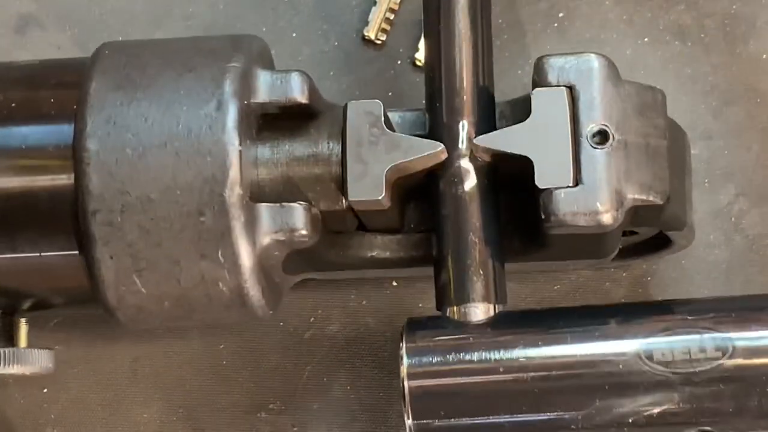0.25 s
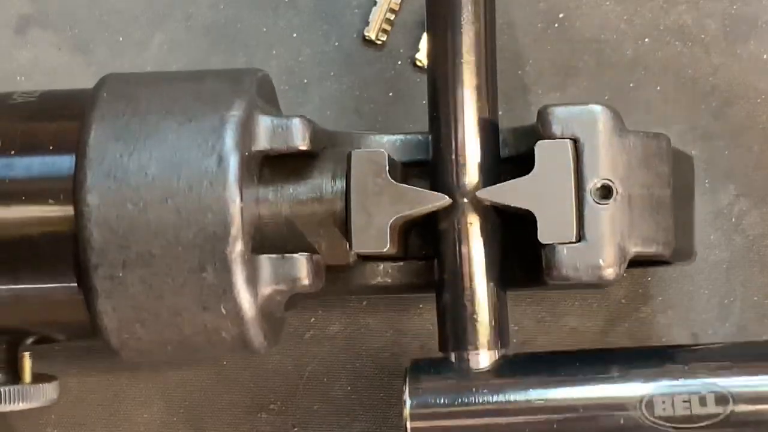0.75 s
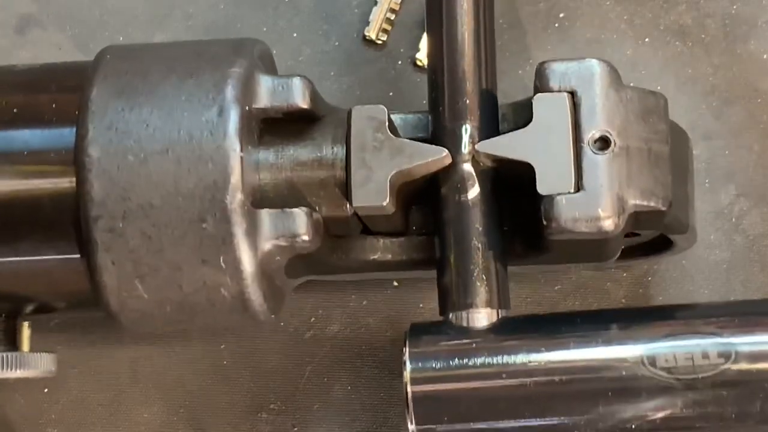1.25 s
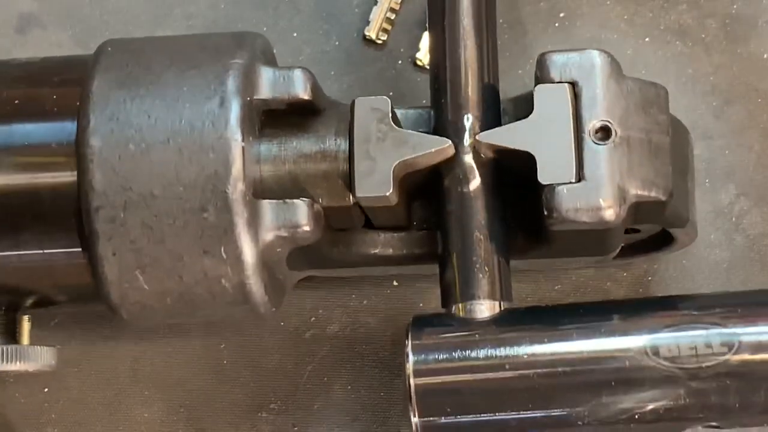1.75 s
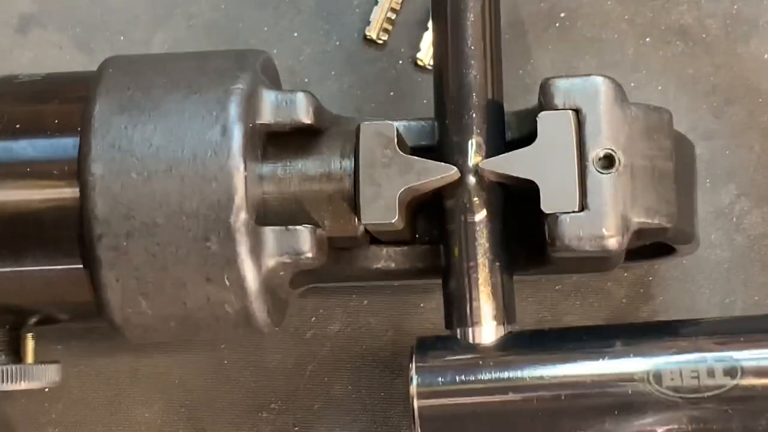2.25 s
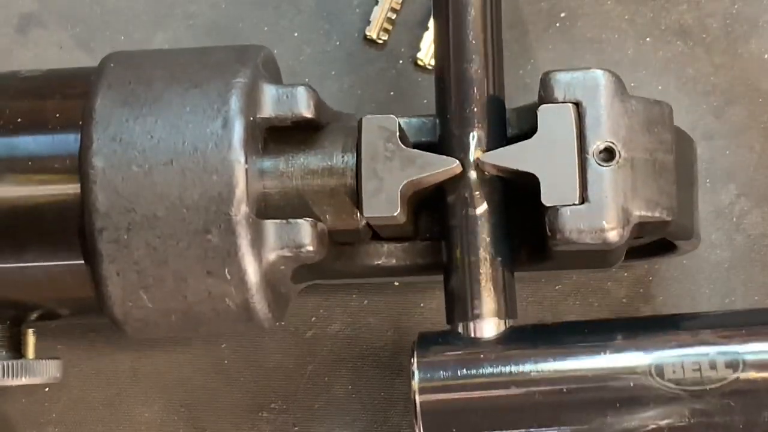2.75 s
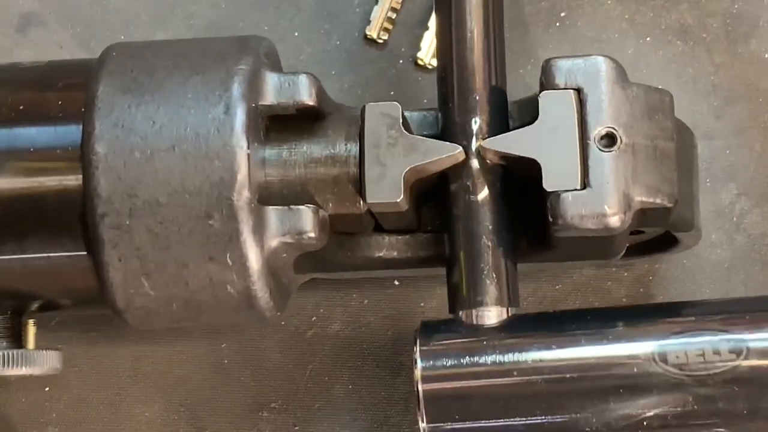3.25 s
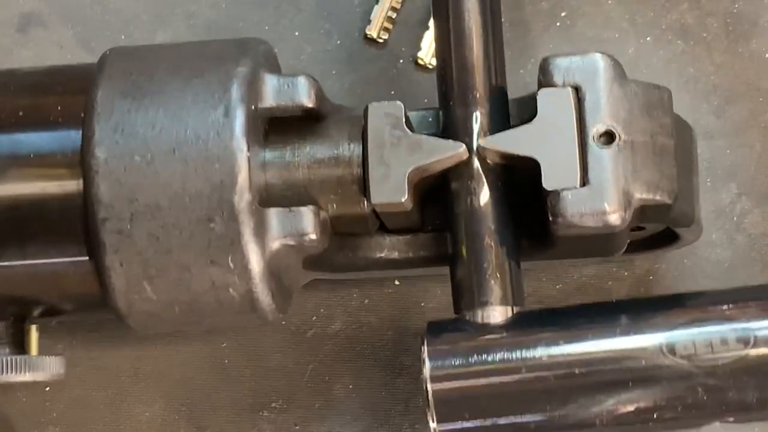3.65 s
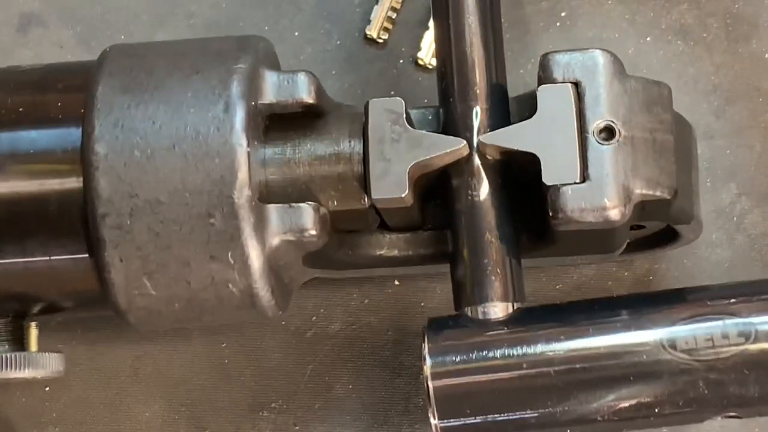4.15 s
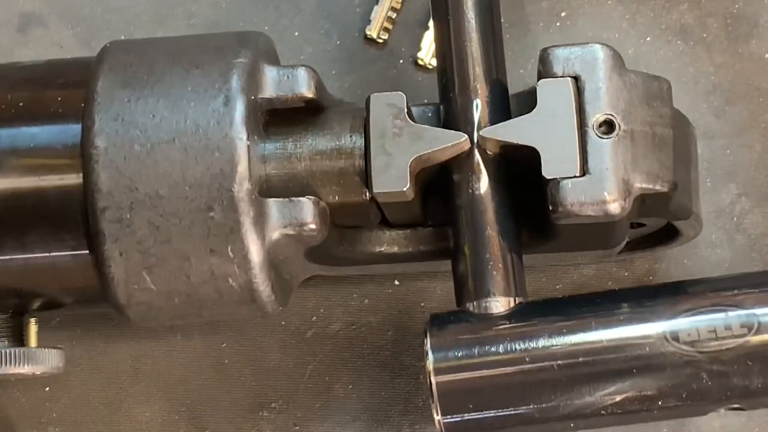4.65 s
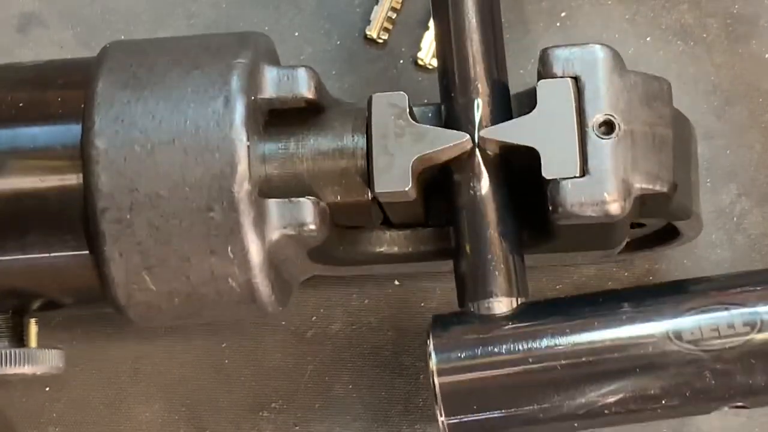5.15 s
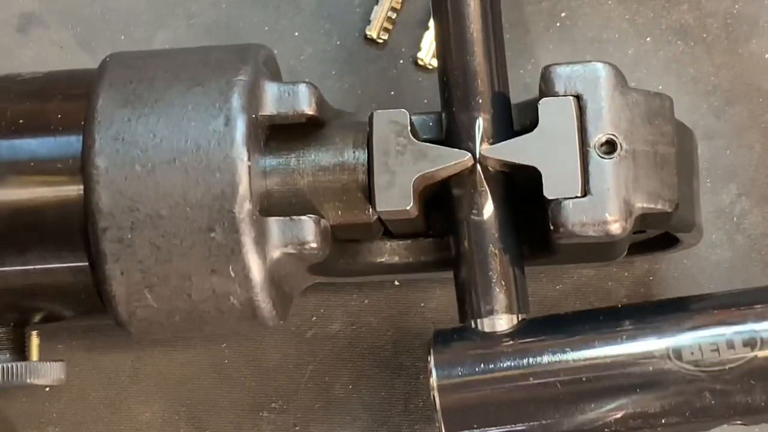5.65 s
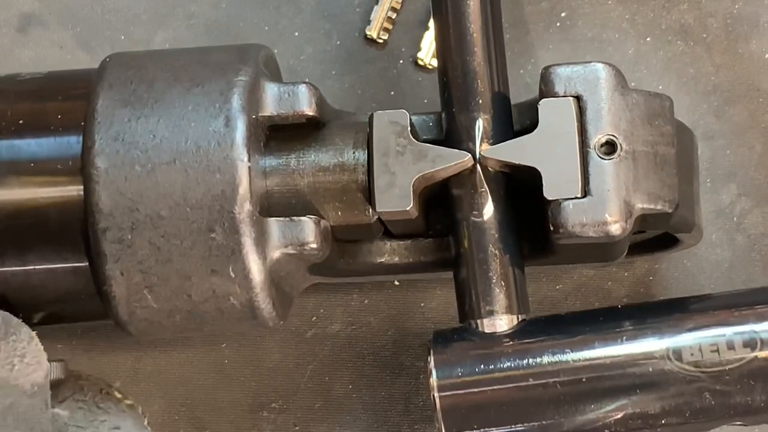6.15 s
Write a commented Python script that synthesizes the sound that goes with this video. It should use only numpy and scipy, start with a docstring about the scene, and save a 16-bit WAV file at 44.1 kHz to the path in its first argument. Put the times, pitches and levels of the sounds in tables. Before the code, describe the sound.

A hand-pumped hydraulic cutter clacks and thumps steadily on a garage workbench until a steel lock shackle snaps with one huge ringing crack, then two more strokes.

```python
"""A garage workbench: a hand-pumped hydraulic cutter works on a steel lock, close to the microphone.
Handle linkage: noise chatter ringing pins and link. Lock: jingles from short noise contacts on steel modes.
Bench: blows ring the top, rock the legs and knock loose things. Shackle: one crack, its peaks saturated.
Behind: sway, glove rustle and plunger hiss as shaped noise; the room's answer, steady air and a mains hum."""
import sys
import numpy as np
from scipy import signal
from scipy.fft import rfft, irfft
from scipy.io import wavfile
from scipy.ndimage import uniform_filter1d

SR = 44100
rng = np.random.default_rng(int(sys.argv[2]) if len(sys.argv) > 2 else 0)


def ratio_of_db(decibels):
    """Turn decibels (scalar or array-like) into linear amplitude factors; 0 dB maps to 1."""
    return 10 ** (np.asarray(decibels, float) / 20)


def transcribe(u):
    """Save the signal u as a 16-bit wav file named by the first command-line argument.

    u: samples, shape (n,) or (channels, n), limited to [-1, 1]; the rate is SR.
    q: integer samples, one column per channel.
    """
    v = np.clip(np.atleast_2d(u).T, -1, 1)
    q = np.round(v * 32767).astype(np.int16)
    wavfile.write(sys.argv[1], SR, q)


N = 282681
SHORT, LONG = SR // 4, SR // 2  # samples

# pull starts, linkage snaps tight: t/s, click level/dB, slack tick lead/s, bench blow level/dB, load/0-1
PULLS = [(.3017, -33.5, .014, -19., .85), (1.0465, -29.8, .0101, -17., 1.),
         (1.8272, -34.5, .0098, -18., 1.), (2.5381, -29.5, .0077, -18., 1.),
         (3.246, -34.7, .0134, -18., .85), (4.0637, -33.9, .0215, -21., 0.),
         (4.7606, -30.5, .0215, -19., 0.)]
# handle hits its stop: t/s, click level/dB, bench blow level/dB, rebound level/dB, knock level/dB re rebound
STOPS = [(.6105, -38.8, -14.5, -25., -14.), (1.3967, -46.7, -20., -38., -3.),
         (2.0936, -40.4, -16., -28., -10.), (2.8024, -35.5, -13., -31., -3.),
         (4.2278, -34.6, -11., -23., -6.), (4.9308, -32.8, -11.5, -22., -7.)]
# loose linkage ticks: t/s, level/dB, brightness/dB per octave, lower pin share/0-1
TICKS = [(.0613, -49.3, -5., .13), (.2329, -48.4, -2.3, .11), (.4738, -55.8, -7.9, .24),
         (.753, -56., -9., .8), (.979, -57., -10., .6), (.8145, -44.7, -7.7, .2),
         (1.3274, -55.5, -7.6, .66), (1.3578, -51.8, -7.6, .93), (1.6013, -45.5, -9.4, .78),
         (1.7784, -46.2, -1.6, .03), (1.926, -50., -8.9, .58), (2.1096, -29.2, -4.9, .36),
         (2.3176, -50.3, -3.8, .06), (2.485, -53., -9., .6), (3.0165, -46.9, -1.8, .06),
         (3.6444, -44.4, 1.3, .12), (3.8028, -54.8, -6.5, .1), (4.567, -53.7, -7.3, .15)]
# upper and lower handle pin: f/Hz, level/dB, t60/s
PIN_MODES = [(3070, 0., .015), (2590, 0., .012)]
# handle link: f/Hz, level/dB before brightness and scatter, t60/s
LINK_MODES = [(780, -10., .02), (2120, -14., .01), (5000, -12., .008), (8000, -5., .008), (9550, -8., .01)]
# lock body knocks against the jaws: t/s, treble level/dB, bar ring near 7 kHz level/dB re treble,
# low knock level/dB re treble
JINGLES = [(0.3496, -51.8, -15.2, -13.7), (0.394, -53.2, -18.5, 0.0), (0.6374, -47.5, -15.3, -15.1),
           (1.0929, -49.0, -15.3, -10.3), (1.8771, -52.3, -12.6, -1.4), (2.0974, -50.9, 0.7, 14.7),
           (2.1096, -37.7, -11.6, 7.0), (2.5574, -45.4, -6.7, 10.4), (2.578, -31.4, -17.4, -12.9),
           (2.5955, -29.5, -4.9, 0.1), (2.6174, -36.8, -23.8, -9.1), (2.809, -25.6, -2.6, 3.2),
           (2.8214, -36.9, 0.4, 2.6), (3.269, -40.0, -0.8, 5.9), (3.2859, -26.9, -26.1, -13.2),
           (3.3089, -27.7, -4.3, 0.3), (3.3294, -47.5, 0.7, 1.3), (3.8611, -55.7, -20.7, -18.2),
           (4.0806, -55.1, 15.0, 14.5), (4.1355, -58.2, -15.2, -11.5), (4.2433, -43.8, -26.2, -6.7),
           (4.2594, -48.8, -33.6, -9.6), (4.9442, -42.2, -22.0, -2.2), (5.0504, -59.6, -27.0, -7.0)]
# hardened steel lock: f/Hz, level/dB before scatter, t60/s of a jingle
LOCK_MODES = [(2700, -2., .015), (3935, -13., .08), (4380, -7., .018), (7084, -6., .12), (7240, -1., .12),
              (7290, -2., .04), (9985, 0., .04), (10370, -11., .08), (10920, -10., .04), (11680, -7., .04),
              (12500, -6., .02), (15100, -9., .05), (15350, -8., .04)]
# shackle burst spectrum: f/Hz, relative level/dB
CRACK_COLOUR = [(200, -10.), (400, -2.5), (750, -10.), (1100, -7.), (1550, -11.), (2050, -7.), (2900, -9.),
                (3860, -3.), (5840, -6.), (9000, -8.), (15800, -20.)]
# cutter jumps after the crack: t/s, blow level/dB, rocking level/dB re blow, knock level/dB re blow
RECOIL = [(3.433, -15., -8., -7.), (3.455, -7., 0., -7.), (3.473, -13., -3., -3.), (3.492, -17., -5., -8.),
          (3.53, -24., -4., -9.)]
# bench on its legs: f/Hz, level/dB, t60/s
ROCKING_MODES = [(44, -2., .14), (27, -1., .22)]
# bench top: f/Hz, level/dB before scatter, t60/s
TOP_MODES = [(118, 1.2, .11), (155, -4., .07), (222, -8., .12)]
# loose things on the bench, spectrum: f/Hz, relative level/dB
KNOCK_COLOUR = [(120, -16.), (220, 0.), (450, -3.), (900, -12.), (2000, -26.), (6000, -45.)]
# bracket: f/Hz, level/dB, t60/s
BRACKET_MODES = [(1168, 0., .25), (1287, -10., .2)]
# hands idle: t/s, sway level/dB, rustle level/dB
RESTING = [(0., -47., -66.), (.15, -48., -75.), (4.6, -53., -76.), (5.25, -51., -74.), (5.55, -48., -65.),
           (5.8, -51., -76.), (6.4, -53., -78.)]
# bench sway spectrum: f/Hz, relative level/dB
SWAY_COLOUR = [(3, 3.), (8, -1.), (22, 2.), (50, -6.), (85, -22.), (118, -12.), (160, -24.), (250, -30.),
               (400, -50.)]
# glove rustle spectrum: f/Hz, relative level/dB
RUB_COLOUR = [(150, -14.), (400, 4.), (1000, 0.), (2000, -8.), (5000, -30.)]
# oil hissing past the plunger, and a sleeve brushing: t/s, length/s, level/dB
HISSES = [(.32, .12, -64.), (1.08, .1, -62.), (1.84, .17, -62.), (2.03, .07, -63.), (2.7, .11, -62.),
          (4.15, .085, -58.), (4.78, .1, -66.), (4.86, .08, -61.), (5.42, .24, -64.), (5.69, .12, -66.)]
# hiss spectrum: f/Hz, relative level/dB
HISS_COLOUR = [(800, -20.), (2500, 0.), (5000, -4.), (9000, -16.), (16000, -30.)]
# room answer: f/Hz, t60/s
GARAGE_T60 = [(120, .29), (350, .38), (840, .4), (2210, .38), (5820, .33), (12000, .19)]
# steady air spectrum: f/Hz, relative level/dB
AIR_COLOUR = [(18, 3.), (55, 1.), (75, -11.), (188, -30.), (260, -19.), (500, -26.), (800, -30.),
              (2390, -36.), (6000, -38.), (6500, -33.), (7000, -40.), (15800, -45.)]
# mains harmonics: f/Hz, level/dB rms
HUM = [(360.7, -69), (419.9, -82), (479.1, -71), (597.5, -78), (721.4, -80), (839.8, -83)]

CRACK_S, REBOUND_LAG_S = 3.4306, .048
# swells after a move; a pull's two levels are without and with load
PULL_SWAY_RISE_S, PULL_SWAY_FALL_DB_PER_S, PULL_SWAY_DB = .04, 45., (-47., -33.5)
PULL_RUB_RISE_S, PULL_RUB_FALL_DB_PER_S, PULL_RUB_DB = .11, 90., (-66., -49.5)
# shared by stops and crack, sway and rustle
HIT_RISE_S, HIT_FALL_DB_PER_S = .14, 70.


def evened(x):
    """Scales to rms 1."""
    return x / np.sqrt(np.mean(x ** 2) + 1e-20)


def by_attack(x):
    """Scales a hit to rms 1 over its first 6 ms."""
    return x / np.sqrt(np.mean(x[:265] ** 2))


def read(points, hz):
    """Reads an f/Hz table on a log-frequency axis."""
    f_hz, value = np.transpose(points)
    return np.interp(np.log(hz + 1), np.log(f_hz + 1), value)


def add(mix, s, sound):
    """Mixes a sound in at time s."""
    part = mix[round(s * SR):][:len(sound)]
    part += sound[:len(part)]


def coloured(count, colour_db):
    """Noise of rms 1 whose spectrum is the function colour_db(hz)."""
    hz = np.fft.rfftfreq(count, 1 / SR)
    spectrum = rfft(rng.standard_normal(count))
    return evened(irfft(spectrum * ratio_of_db(colour_db(hz)), count))


def ring(modes, count, bright_db=0, spread_db=0, length=1):
    """Dying sines; every blow lands elsewhere, so mode heights scatter when spread_db is set."""
    t = np.arange(count) / SR
    hz, db, t60_s = np.transpose(modes)[:, :, None]
    db = db + bright_db * np.log2(hz / 8192)
    db = db + spread_db * rng.standard_normal(hz.shape)
    decay_db = 60 * t / np.maximum(t60_s * length, .004)
    return (ratio_of_db(db - decay_db) * np.sin(2 * np.pi * hz * t)).sum(0)


def burst(count, t60_s, colour_db, rise_s=.0006):
    """A puff of noise with a sudden start and exponential decay."""
    t = np.arange(count) / SR
    decay = ratio_of_db(-60 * t / max(t60_s, .004))
    return coloured(count, colour_db) * decay * np.minimum(t / rise_s, 1)


def low_cut_db(hz):
    """Weakens a small hard contact towards the bass."""
    return -12 * np.log2(1 + 1500 / (hz + 50))


def loaded(pair, load):
    """Blends a value from the free handle to the loaded one."""
    return pair[0] + (pair[1] - pair[0]) * np.clip(load, 0, 1)


def swell(s, db, rise_s, fall_db_per_s):
    """Power of a movement that grows after s, then dies away."""
    t = np.arange(N) / SR - s
    fall_db = fall_db_per_s * np.maximum(t - rise_s, 0)
    return (ratio_of_db(db - fall_db) * np.clip(t / rise_s, 0, 1)) ** 2


def clicks():
    """Every linkage click: t/s, level/dB, brightness/dB per octave, burst t60/s, lower pin share."""
    snap, slack, stop = (-2.4, .048, .12), (-8.4, .04, .3), (-7.6, .04, .92)
    slack_db, tick_t60_s = -51.5, .038
    snaps = [(s, db, *snap) for s, db, *_ in PULLS]
    slacks = [(s - lead_s, slack_db, *slack) for s, _, lead_s, *_ in PULLS]
    stops = [(s, db, *stop) for s, db, *_ in STOPS]
    ticks = [(s, db, bright_db, tick_t60_s, lower) for s, db, bright_db, lower in TICKS]
    return snaps + slacks + stops + ticks


def linkage():
    """Play in the handle joints closes: a short chatter rings the pins and link."""
    out = np.zeros(N)
    upper_pin, lower_pin = (ring([pin], SHORT) for pin in PIN_MODES)
    for s, db, bright_db, t60_s, lower in clicks():
        def colour_db(hz):
            tilt_db = bright_db * np.log2(np.maximum(hz, 2000) / 4096)
            return tilt_db + low_cut_db(hz) - 6. * (hz / 15000) ** 3

        chatter = burst(SHORT, t60_s, colour_db, .0003)
        pins = (1 - lower) * upper_pin + lower * lower_pin
        body = pins + ring(LINK_MODES, SHORT, bright_db / 2, 2.5)
        ringing = signal.fftconvolve(chatter, body)[:SHORT]
        ring_db = -21 + .3 * (db + 33)  # harder clicks ring the pins more
        add(out, s, ratio_of_db(db) * by_attack(chatter + ratio_of_db(ring_db) * ringing))
    return out


def lock():
    """A short rough contact rings hardened steel; where it lands sets which modes answer."""
    out = np.zeros(N)
    hz = np.fft.rfftfreq(LONG, 1 / SR)
    for s, db, bar_db, knock_db in JINGLES:
        tick = burst(LONG, .056, lambda hz: .75 * low_cut_db(hz), .0003)
        ringing = signal.fftconvolve(tick, ring(LOCK_MODES, LONG, 0, 3.))[:LONG]
        steel = rfft(tick + ratio_of_db(-25) * ringing)
        for lo_hz, hi_hz, part_db in [(0, 6200, knock_db), (6200, 8000, bar_db), (8000, 20000, 0)]:
            inside = 1 / (1 + (lo_hz / (hz + 1)) ** 24) / (1 + (hz / hi_hz) ** 24)
            part = irfft(steel * inside, LONG)[:SHORT]
            add(out, s, ratio_of_db(db + part_db) * by_attack(part))
    return out


def crack():
    """The shackle snaps: a wide burst, and all the steel rings at once, longer than in a jingle."""
    out = np.zeros(N)
    snap = burst(SR, .075, lambda hz: read(CRACK_COLOUR, hz), rise_s=.0004)
    add(out, CRACK_S, ratio_of_db(7.) * snap)
    add(out, CRACK_S, ratio_of_db(-9.) * ring(LOCK_MODES, SR, -3., 1.5, length=2.2))
    return out


def thumps():
    """Every bench blow: t/s, level/dB, rocking level/dB re blow, knock level/dB re blow."""
    pull_lag_s, pull_rock_db, pull_knock_db = (.0053, .0093), (-21., -8.), -27.  # pairs: free, loaded
    stop_lag_s, stop_rock_db, stop_knock_db = .0014, -3.5, -17.5
    pulls = [(s + loaded(pull_lag_s, load), db, loaded(pull_rock_db, load), pull_knock_db)
             for s, _, _, db, load in PULLS]
    stops = [(s + stop_lag_s, db, stop_rock_db, stop_knock_db) for s, _, db, _, _ in STOPS]
    rebounds = [(s + REBOUND_LAG_S, db, -14., knock_db) for s, _, _, db, knock_db in STOPS]
    return pulls + stops + rebounds + RECOIL


def bench():
    """The top dips first, the whole bench rocks back a moment later, loose things knock."""
    out = np.zeros(N)
    for s, db, rocking_db, knock_db in thumps():
        push_ms = np.clip(-19. - knock_db, 2.2, 6.5)  # slow pushes knock least
        push = np.hanning(round(push_ms * SR / 1000))
        top = np.convolve(ring(TOP_MODES, LONG, 0, 1.2), push / push.sum())
        knock = burst(LONG, .15, lambda hz: read(KNOCK_COLOUR, hz), rise_s=.0035)
        add(out, s, -ratio_of_db(db) * top)
        add(out, s + .004, ratio_of_db(db + rocking_db) * ring(ROCKING_MODES, LONG))
        add(out, s, ratio_of_db(db + knock_db) * knock)
    return out + bracket()


def bracket():
    """A bracket takes up the shake of each rebound and of the recoil slowly, then rings."""
    out = np.zeros(N)
    onset = np.minimum(np.arange(LONG) / SR / .015, 1)
    shakes = [(s + REBOUND_LAG_S, db + knock_db - 12.) for s, _, _, db, knock_db in STOPS]
    for s, db in shakes + [(3.49, -15.5)]:  # last: recoil
        add(out, s, ratio_of_db(db) * onset * ring(BRACKET_MODES, LONG))
    return out


def resting_power(column):
    """Power of the idle hands, from one level column of RESTING."""
    table = np.transpose(RESTING)
    return ratio_of_db(np.interp(np.arange(N) / SR, table[0], table[column])) ** 2


def sway():
    """Pulls, stops and the crack sway the bench: low noise under summed swells."""
    power = resting_power(1)
    for s, *_, load in PULLS:
        power += swell(s, loaded(PULL_SWAY_DB, load), PULL_SWAY_RISE_S, PULL_SWAY_FALL_DB_PER_S)
    for s, db in [(s, db - 23.5) for s, _, db, _, _ in STOPS] + [(CRACK_S, -30.)]:
        power += swell(s, db, HIT_RISE_S, HIT_FALL_DB_PER_S)
    return np.sqrt(power) * coloured(N, lambda hz: read(SWAY_COLOUR, hz))


def gloves():
    """Gloves rustle by slipping in small random jerks, each dying exponentially."""
    power = resting_power(2)
    for s, *_, load in PULLS:
        power += swell(s, loaded(PULL_RUB_DB, load), PULL_RUB_RISE_S, PULL_RUB_FALL_DB_PER_S)
    for s, db in [(s, db - 47.) for s, _, db, _, _ in STOPS] + [(CRACK_S, -55.)]:
        power += swell(s, db, HIT_RISE_S, HIT_FALL_DB_PER_S)
    slips_per_s, slip_decay_s = 130., .006
    slip_height = ratio_of_db(3.8 * np.minimum(rng.exponential(1, N), 4))
    slips = (rng.random(N) < slips_per_s / SR) * slip_height
    jerks = signal.lfilter([1], [1, -np.exp(-1 / (slip_decay_s * SR))], slips)
    gritty = evened(jerks) + 1.3
    return np.sqrt(power) * evened(gritty * coloured(N, lambda hz: read(RUB_COLOUR, hz)))


def plunger():
    """Oil forced past the plunger, or a brushing sleeve: grainy hiss in smooth puffs."""
    flow = np.zeros(N)
    for s, length_s, db in HISSES:
        add(flow, s, ratio_of_db(db) * signal.windows.tukey(round(length_s * SR), .7))
    grain = ratio_of_db(2.2 * evened(uniform_filter1d(rng.standard_normal(N), size=400)))
    return flow * evened(grain * coloured(N, lambda hz: read(HISS_COLOUR, hz)))


def garage(x):
    """Three noise tails, t60 by band, crossfaded at 20 Hz: a long hit's reverberation keeps changing grain."""
    hz, t, z = signal.stft(rng.standard_normal((3, SR)), SR, nperseg=256)
    fade = ratio_of_db(-60 * t / read(GARAGE_T60, hz)[:, None])
    tails = signal.istft(z * fade, SR, nperseg=256)[1]
    tails *= np.clip(np.arange(tails.shape[1]) / SR / .012 - .3, 0, 1)  # walls answer after a few ms
    tails /= np.linalg.norm(tails[0])
    cycles = 20 * np.arange(N) / SR + np.arange(3)[:, None] / 3  # a third of a cycle apart
    crossfade = np.cos(2 * np.pi * cycles) * np.sqrt(2 / 3)
    return signal.fftconvolve(x * crossfade, tails, axes=1)[:, :N].sum(0)


def room_tone():
    """Steady air noise and faint mains harmonics."""
    t = np.arange(N) / SR
    out = ratio_of_db(-51.6) * coloured(N, lambda hz: read(AIR_COLOUR, hz))
    for hz, db in HUM:
        out += np.sqrt(2) * ratio_of_db(db) * np.sin(2 * np.pi * (hz * t + rng.random()))
    return out


def scene():
    """Struck parts sound in the garage, small ones and bench drier; movement and room tone come directly."""
    small, snap, wood = linkage() + lock(), crack(), bench()
    answer = ratio_of_db(-10.) * garage(.52 * small + 1.05 * snap + .75 * wood)
    pumping = sway() + gloves() + plunger()
    return (small + snap + wood + answer + pumping + room_tone())[None]


def top_cut(x):
    """Nothing passes above the cut-off."""
    return signal.sosfilt(signal.butter(12, 15930, fs=SR, output="sos"), x)


def record(dry):
    """Peaks saturate near full scale; a low-pass then softens the top treble."""
    clipped = .88 * np.tanh(dry / .88)
    low_pass = signal.butter(6, 16500, fs=SR, output="sos")
    finished = signal.sosfilt(low_pass, clipped)
    return top_cut(finished)


dry = scene()
out = record(dry)
transcribe(out)
```